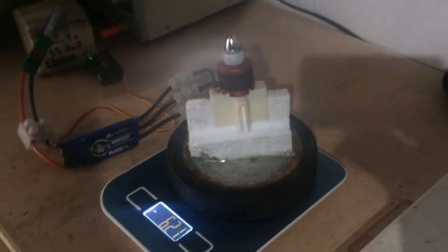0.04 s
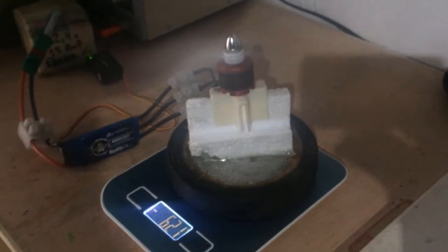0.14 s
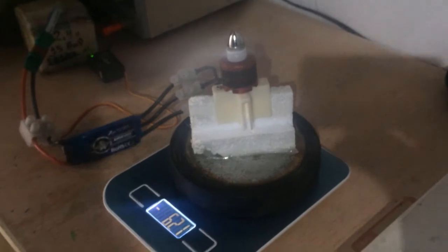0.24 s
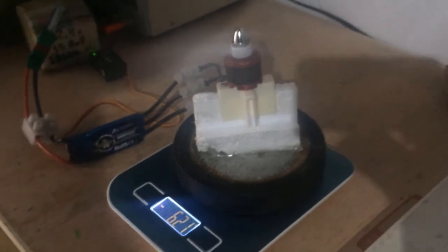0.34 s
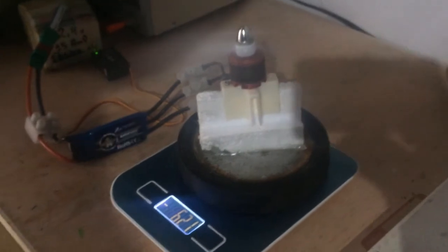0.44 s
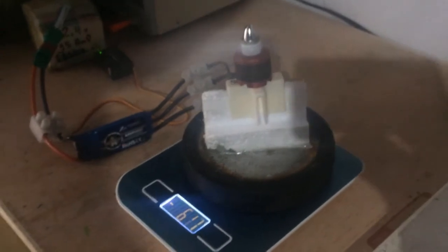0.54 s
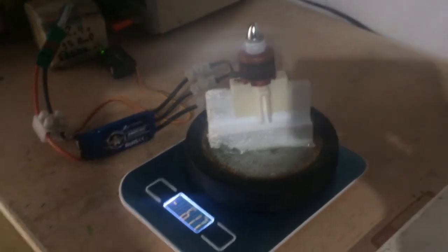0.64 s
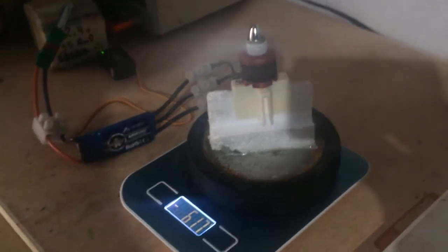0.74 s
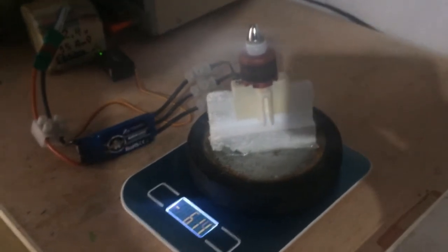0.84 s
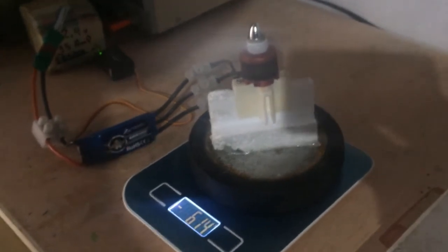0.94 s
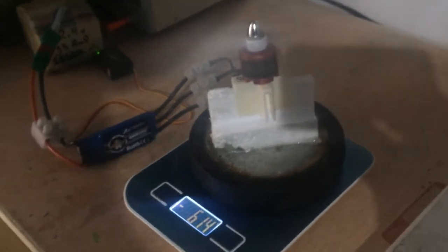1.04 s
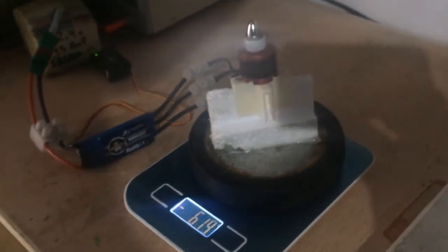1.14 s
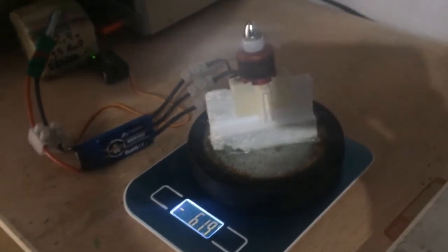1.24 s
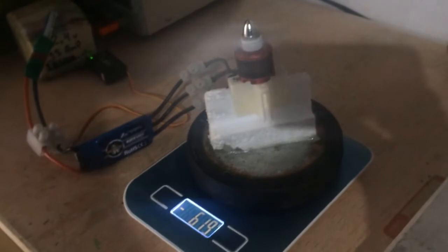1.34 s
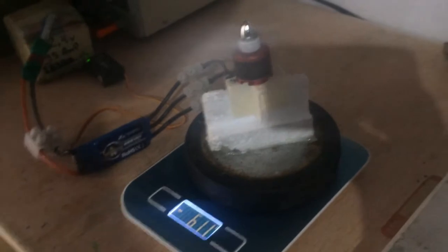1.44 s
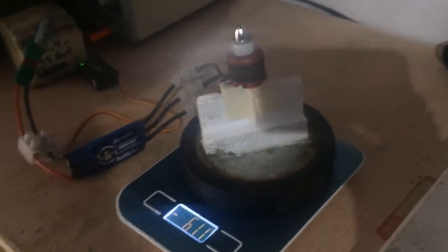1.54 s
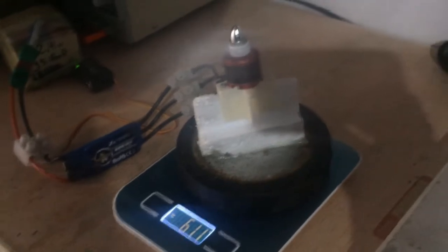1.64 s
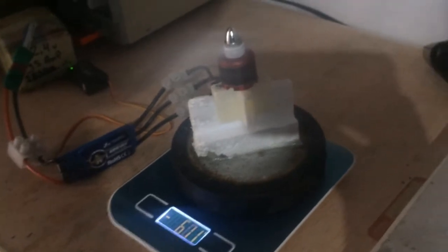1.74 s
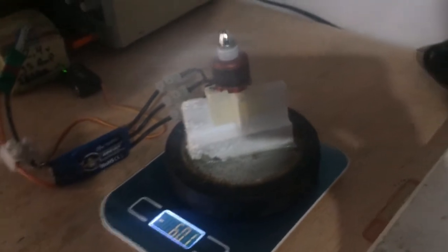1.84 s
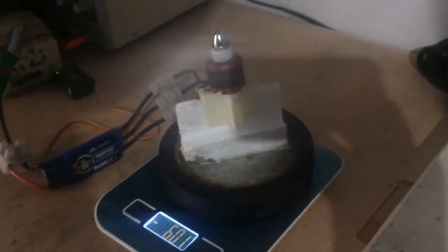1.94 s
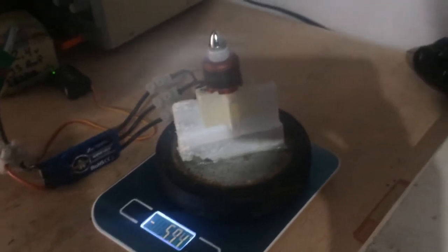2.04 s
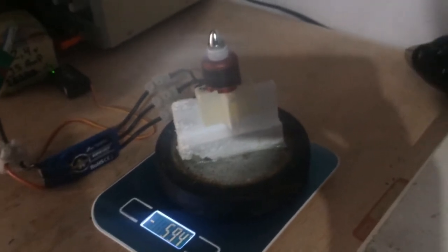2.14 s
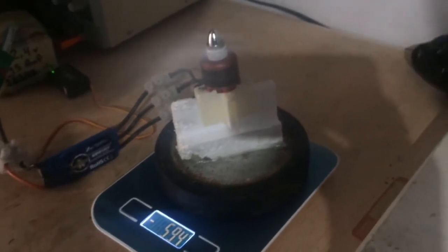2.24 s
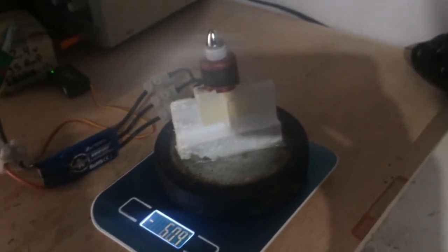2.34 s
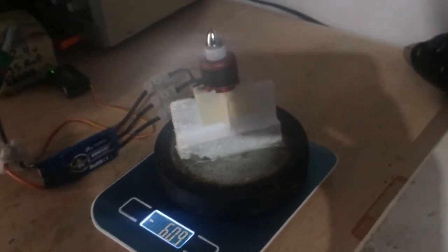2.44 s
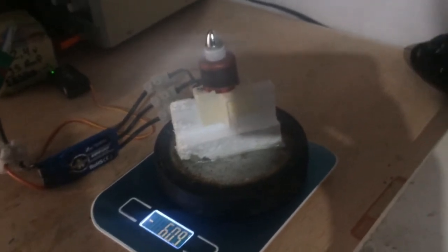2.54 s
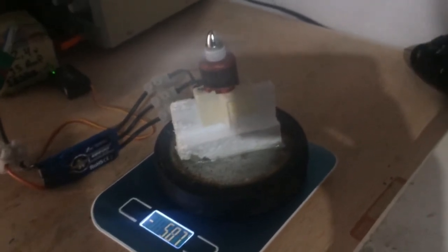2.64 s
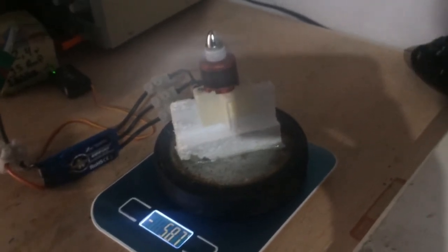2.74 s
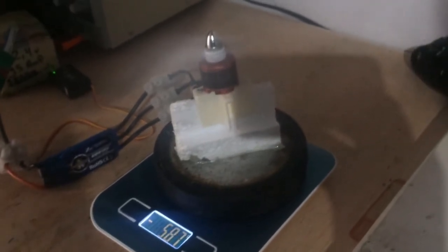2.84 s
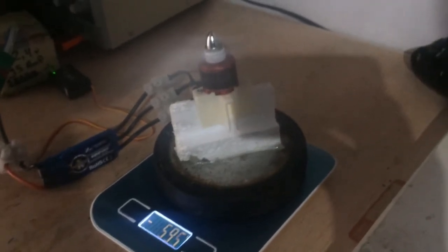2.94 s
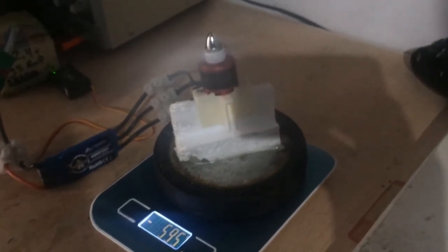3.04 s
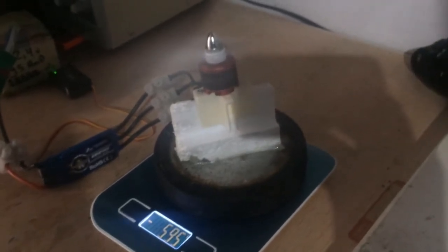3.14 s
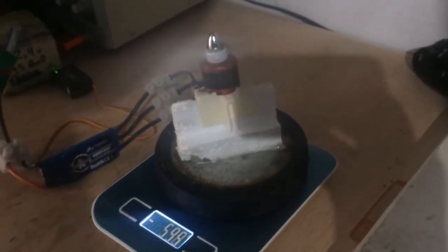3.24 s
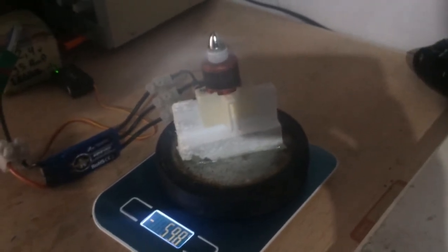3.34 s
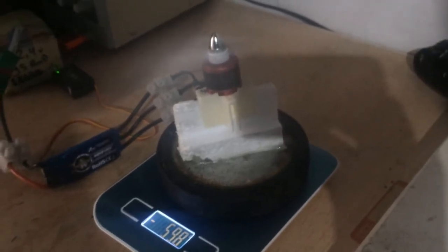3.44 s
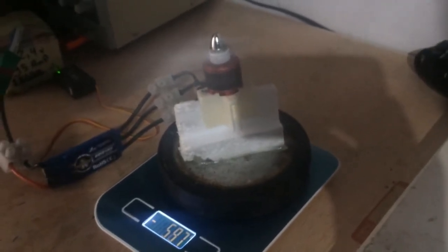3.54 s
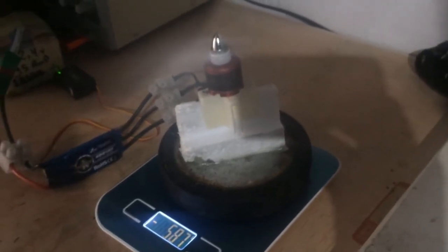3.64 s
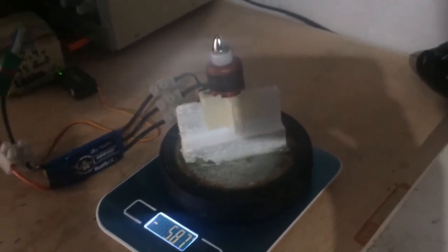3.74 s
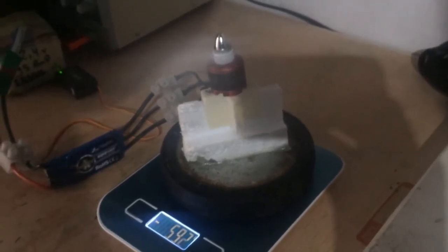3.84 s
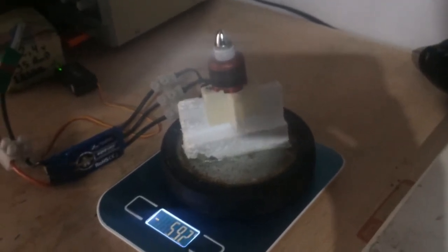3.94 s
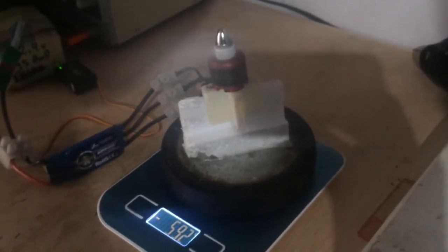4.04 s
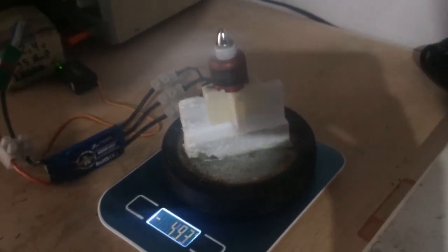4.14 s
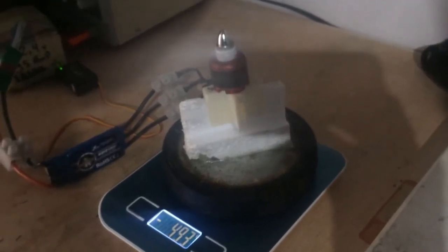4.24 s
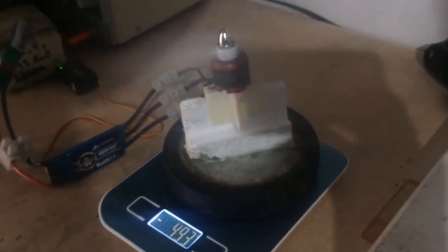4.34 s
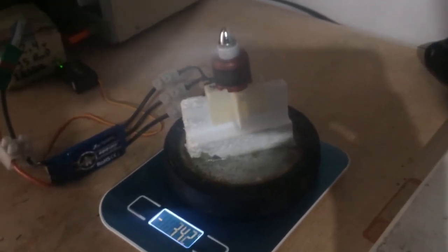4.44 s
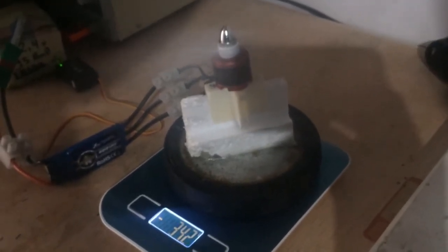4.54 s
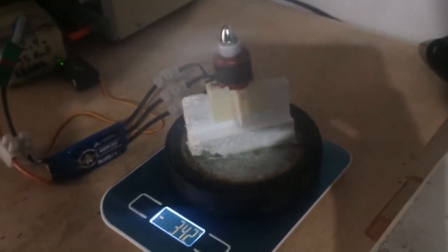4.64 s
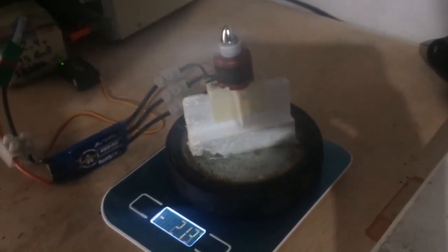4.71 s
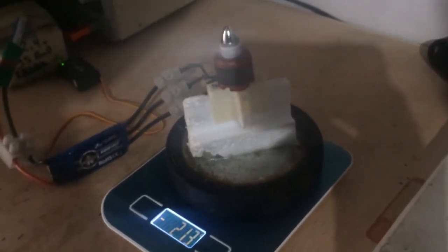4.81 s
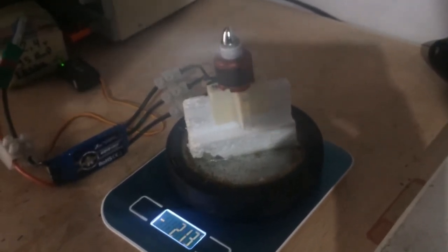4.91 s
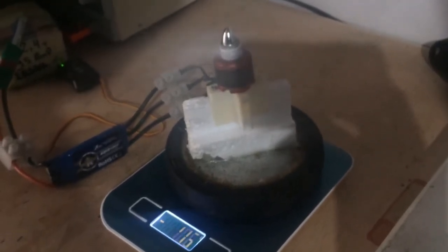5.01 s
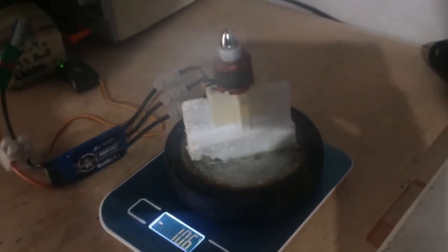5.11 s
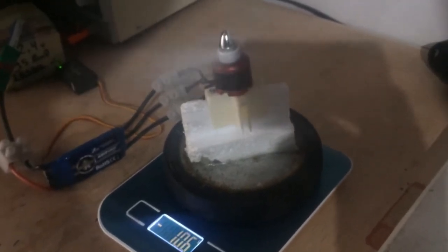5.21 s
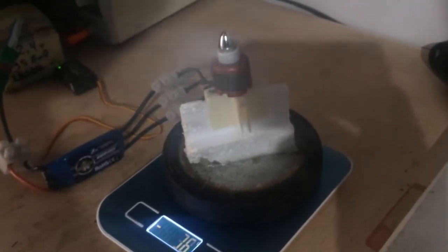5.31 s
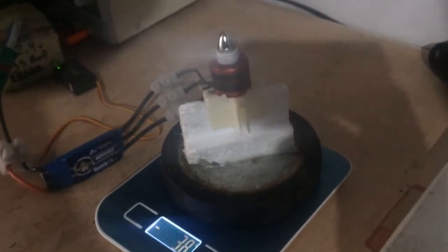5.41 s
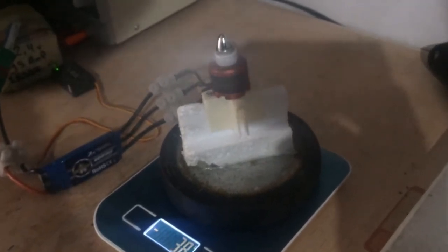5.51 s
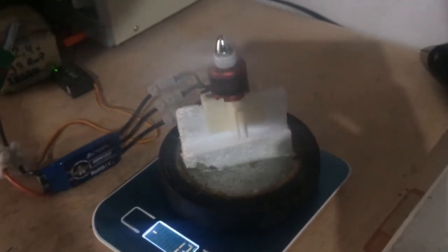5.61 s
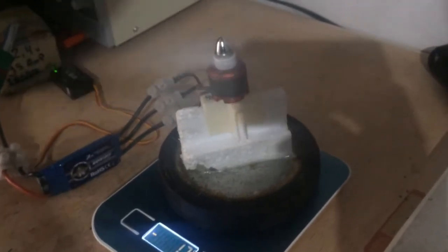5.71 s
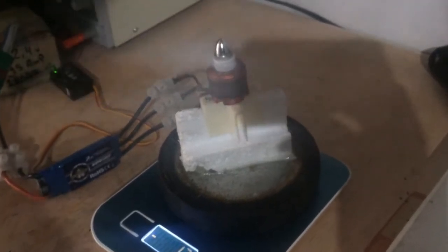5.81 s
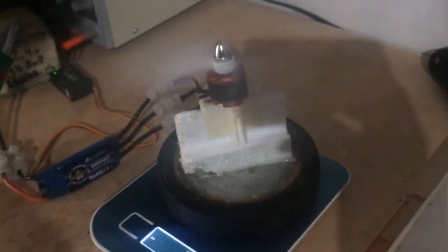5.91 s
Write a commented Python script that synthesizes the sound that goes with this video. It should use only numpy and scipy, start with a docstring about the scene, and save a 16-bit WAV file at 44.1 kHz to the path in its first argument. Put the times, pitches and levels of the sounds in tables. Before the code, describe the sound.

Close up in a small room, a little brushless motor spins a two-blade propeller flat out: deep blade hum, choppy fluttering air, bright hiss, a high whine and bearing rattle. Just before four seconds the throttle drops; pitch slides down under a thin electronic whistle, which stops at about five seconds, leaving a short ping and loose knocks dying into quiet room noise.

```python
"""A 14-pole brushless motor spins a two-blade propeller on a kitchen scale, close to the microphone in a small room.
At full throttle the blades hum, chop eddies and hiss; the magnets whine and a worn bearing sings and rattles.
Just before 4 s the throttle is pulled back: the controller's switching whistles through the motor's resonances.
The rotor slows and the whistle stops at about 5 s; the stand pings and the loose rotor knocks as it coasts.
Tones follow one shaft angle; air and rattle are shaped noise. Both channels are the same."""
import sys
import numpy as np
from scipy import signal
from scipy.fft import rfft, irfft, next_fast_len
from scipy.io import wavfile

SR = 44100
rng = np.random.default_rng(int(sys.argv[2]) if len(sys.argv) > 2 else 0)


def unload_audio(sound):
    """Save the sound as a 16-bit wav file, at the path given as the first command line argument."""
    columns = np.transpose(np.atleast_2d(sound))
    # keep every value between -1 and 1, then stretch to whole-number steps
    steps = np.round(np.clip(columns, -1, 1) * 32767)
    wavfile.write(sys.argv[1], SR, steps.astype(np.int16))


N = 263361
T = np.arange(N) / SR

# All levels in the tables are relative: the layers set further gains.

# Shaft speed from full throttle, through the pull-back, to the coast: time_s, shaft_hz
RUNDOWN = [(3.81, 126), (3.86, 124.4), (3.93, 119), (4, 114.5), (4.1, 106.7), (4.2, 100), (4.3, 96.4),
           (4.5, 82.6), (4.6, 76.4), (4.8, 61.8), (4.9, 56.5), (5.1, 41.1), (5.3, 31), (5.5, 23),
           (5.95, 14.3)]
# At full throttle the speed sags slowly with the battery
FULL_HZ, SAG_HZ_PER_S = 126.66, .17
# The chop swells and sinks; it also sinks a little as the slowdown begins: centre_s, swell_db
SWELLS = [(.35, 4.5), (.75, 3), (1.36, 4), (2.15, 3), (2.4, 2), (2.75, -1.5), (3.03, 3), (3.55, -2),
          (3.75, 4), (4.03, -2)]
SWELL_S = 0.1203
# The shaft speeds up a little with each swell of the chop
SWELL_HZ_PER_DB = .035

# Steady blade tones: multiple_of_shaft_rate, level_db
BLADE_ORDERS = [(1, -25), (2, 0), (4, -16), (6, -22), (8, -16), (10, -22), (12, -24), (16, -18)]
# The blade hum sinks with its pitch: blade_pass_hz, gain_db
HUM_GAIN = [(40, -62), (70, -41.5), (86, -30.5), (108, -28), (175, -23.5), (212, -18), (242, -13),
            (256, -15)]
# Resonance of the stand that the hum excites: centre_hz, width_hz, level_db
HUM_STAND_MODE = [(728, 18, -13)]

# Spectra of chopped eddies and trailing-edge hiss: frequency_hz, level_db
EDDY_SPECTRUM = [(250, -5), (500, -5.5), (750, -1), (1000, 3), (1300, 2), (1600, 1.5), (2300, -5.5),
                 (2900, -4.5), (3350, -6), (3800, -13.5), (4400, -11.5), (6000, -21), (8000, -32)]
HISS_SPECTRUM = [(30, -26), (150, -4), (350, -7.5), (600, -5.5), (1100, -5), (2000, 0), (4000, -2),
                 (5500, 0.5), (7500, 0), (10000, -3.5), (12000, -7), (15500, -12.5)]
# Eddies, hiss and rattle are steady at speed, weaker below a knee: level_db, knee_shaft_hz, loss_db_per_halving
EDDY_LAW = (-19.5, 118, 13.5)
HISS_LAW = (-16.5, 78, 25)
RATTLE_LAW = (-19, 44.7, 18)

# The scale rocks on its springs: centre_hz, width_hz, level_db
SCALE_MODES = [(69, 14.5, -1.5), (112.4, 13, 1.5), (221.03, 90, -11.5)]

# Pull of the poles under power, and of slots and poles when coasting: multiple_of_shaft_rate, level_db
POLE_ORDERS = [(14, 0)]
COGGING_ORDERS = [(12, -9), (14, 0)]
# The pole tone fades slowly under power
POLE_START_DB, POLE_FADE_DB_PER_S = -17.5, 1.4
# Six commutations per pole pair, and other multiples of the electrical rate: multiple_of_shaft_rate, level_db
WHINE_ORDERS = [(42, 0), (56, -31), (63, -31), (84, -30)]
# Gain of the commutation whine: time_s, gain_db
WHINE_GAIN = [(.1, -11.7), (.35, -10), (1.1, -13.5), (1.55, -13.3), (1.7, -17.5), (2.4, -17.5), (3.2, -15),
              (3.8, -16.5)]
# Each passing blade loads the motor and puts sidebands on the whine: multiple_of_shaft_rate, level_db
SIDEBAND_ORDERS = [(38, -2), (40, -6), (44, 0), (46, -7), (48, -14)]

# The balls roll out of step with the shaft: multiple_of_shaft_rate, level_db
BEARING_ORDERS = [(7, -13), (14.98, -4), (15.12, 0), (18.12, -10), (19.11, -10), (19.25, -12), (20.11, -4),
                  (20.25, -10), (21.14, -13), (21.25, -11), (22.14, -10)]
# Resonances of motor and stand: centre_hz, width_hz, level_db
STAND_MODES = [(539, 53, -11), (874, 27, -7), (1432, 52.67, -7), (1888, 77.4, 2.5), (2253, 186, -3),
               (2436, 106, 1.5), (2670, 173, -5), (3220, 84, -4)]
# Spectrum of the rattle: frequency_hz, level_db
RATTLE_SPECTRUM = [(100, -23), (500, -11), (1200, -17), (2000, -22), (3200, -10), (4000, -32), (7500, -27),
                   (10000, -45), (14000, -61)]
# The rattle starts softer and builds as the motor runs
RATTLE_BUILD_DB, RATTLE_BUILD_S = 9.5, 0.79

# Quiet room noise: frequency_hz, level_db
ROOM_SPECTRUM = [(25, -18), (50, -3), (120, -2.5), (300, -9.5), (700, 3), (1200, -10), (3000, -22),
                 (6000, -41.5), (15000, -58)]

# The controller's switching rate creeps up; SWITCH_HZ is its value at PART_THROTTLE_S
PART_THROTTLE_S, SWITCH_HZ, SWITCH_DRIFT_HZ_PER_S = 3.9, 7709, 62
# Its whistle is loudest at middling throttle: level_db, peak_shaft_hz, shaft_hz_either_side_for_6_db_less
WHISTLE_LAW = (-17, 102.6, 41)
# Force waves of the chopped current: multiple_of_switching_rate, multiple_of_shaft_rate
FORCE_WAVES = [(0, 14), (0, 21), (0, 21), (0, 42), (0, 42), (0, 49), (0, 70), (0, 84), (0, 98), (1, -21),
               (1, -21), (1, -28), (1, -35)]
# The motor resonance each wave sweeps through, in the same order; the response is squared in use:
# centre_hz, width_hz, level_db before squaring
MOTOR_MODES = [(1403, 38, 0), (2180, 48, 1), (1883, 80, -0.5), (3165, 90, -1.5), (4960, 156, -4),
               (4930, 83, -0.5), (4976.6, 120, -2.5), (6550, 200, -4), (5150, 260, -3), (5860, 190, -4.5),
               (6690, 140, -8), (5190.7, 110, -0.5), (4970, 72.405, -1)]

# Knocks of the loose rotor: time_s, level_db
KNOCKS = [(5.0155, -13), (5.0384, -17.5), (5.1586, -13.5), (5.1946, -17), (5.2143, -22), (5.2335, -20),
          (5.2649, -20), (5.3063, -23.5), (5.338, -19.5), (5.3714, -13.5), (5.4096, -24), (5.4463, -17.5),
          (5.4879, -18), (5.5193, -20), (5.5327, -17), (5.5603, -37), (5.578, -18.5), (5.6096, -23),
          (5.6234, -26), (5.672, -20), (5.7256, -17.5), (5.783, -16), (5.839, -20.5), (5.9047, -13)]
# The stand pings as the drive lets go: centre_s, pitch_hz, level_db
PING = (5.089, 1896, -9)

START_S, TOP_HZ = .083, 15500


def undb(db):
    """Decibels to an amplitude factor."""
    return 10 ** (np.asarray(db) / 20)


def curves(table):
    """Each column of a table, joined by straight lines in time."""
    s, *columns = np.transpose(table)
    return [np.interp(T, s, column) for column in columns]


def unit(x):
    """Scaled to rms 1."""
    return x / np.sqrt(np.mean(x ** 2))


def noise():
    """White noise over the whole scene."""
    return rng.standard_normal(N)


def walk(rate):
    """Smooth chance with rms 1 that changes about rate times a second."""
    count = 2048
    walk_hz = np.arange(count // 2 + 1) * SR / N
    spectrum = rfft(rng.standard_normal(count)) / (1 + (walk_hz / rate) ** 2)
    return unit(np.interp(np.arange(N) * count / N, np.arange(count), irfft(spectrum)))


def gain_at(hz, points):
    """Gain of a spectrum table at given frequencies, joined on a log frequency axis."""
    f, db = np.transpose(points)
    return undb(np.interp(np.log(hz + 1e-9), np.log(f), db))


def response(hz, modes):
    """Complex response of a set of resonances; neighbours alternate in sign."""
    total = 0
    for k, (centre, width, db) in enumerate(modes):
        damping = 1j * hz * width
        total = total + (-1) ** k * undb(db) * damping / (centre * centre - hz * hz + damping)
    return total


def filtered(x, shape, table):
    """x through a spectrum or a set of resonances."""
    size = next_fast_len(N + SR // 2)
    hz = np.arange(size // 2 + 1) * SR / size
    return irfft(rfft(x, size) * shape(hz, table), size)[:N]


def fade(start, end):
    """Goes from 0 at start to 1 at end; with end before start it falls from 1 to 0."""
    return np.clip((T - start) / (end - start), 0, 1)


def tones(angle, orders, flutter_db, rate):
    """Sines locked to the shaft, each fluttering a little in level."""
    total = 0
    for k, db in orders:
        level = undb(db + flutter_db * walk(rate))
        total = total + level * np.sin(k * angle + rng.uniform(0, 2 * np.pi))
    return np.sqrt(2) * total


def by_speed(hz, law):
    """Level in dB of a source that is steady at speed and falls off below a knee."""
    db, knee_hz, halving_db = law
    return db - 10 * np.log10(1 + (knee_hz / hz) ** (halving_db / (10 * np.log10(2))))


def propeller(angle, hz, build_db=2.5, build_s=1.942):
    """Steady hum of the blades; its third harmonic flares as it sinks through a stand resonance."""
    flare = np.abs(response(6 * hz, HUM_STAND_MODE)) * np.sin(6 * angle) * fade(3.8, 3.88)
    # with less thrust the second harmonic stands out more
    second = undb(-14.5) * np.sin(2 * 2 * angle) * fade(5.1, 5.15)
    gain = gain_at(2 * hz, HUM_GAIN) * undb(-build_db * fade(build_s, 0))
    return gain * (tones(angle, BLADE_ORDERS, flutter_db=0.65, rate=15) + second) + flare


def swells():
    """Rise and fall of the chop in dB, a bell-shaped bump or dip at each listed time."""
    return sum(db * np.exp(-((T - s) / SWELL_S) ** 2) for s, db in SWELLS)


def eddies(angle, hz, life_hz=12, wander_rad=.12, own=0.99):
    """Both blades cut each eddy drawn into the disc: bursts of pulses whose strength and timing drift."""
    out, power = 0, 0
    strength_a, strength_b = walk(life_hz), walk(life_hz)
    angle_a = 2 * angle + wander_rad * walk(life_hz)
    angle_b = 2 * angle + wander_rad * walk(life_hz)
    for k in range(2, 27):  # harmonics of the blade passing rate
        gain = gain_at(2 * k * hz, EDDY_SPECTRUM)
        large = strength_a * np.cos(k * angle_a) + strength_b * np.sin(k * angle_b)
        # small eddies pass sooner and blur the high harmonics
        small = walk(2.23 * k) * np.cos(2 * k * angle) + walk(2.24 * k) * np.sin(2 * k * angle)
        out = out + gain * (large + own * np.sqrt(k / 4) * small)
        power = power + gain ** 2
    return out / np.sqrt(power)


def hiss(angle, hz, swish=0.12, slow_hz=45, fast_hz=95):
    """Turbulence at the trailing edges, louder as each blade goes by; its peak sinks as the blades slow."""
    bright = unit(filtered(noise(), gain_at, HISS_SPECTRUM))
    dull = filtered(bright, gain_at, [(1500, -5), (4300, 7), (6500, 2.0), (9000, -0.5), (14000, -16)])
    speed = np.clip((hz - slow_hz) / (fast_hz - slow_hz), 0, 1)
    blend = speed * bright + (1 - speed) * dull
    return blend * (1 + swish * np.cos(2 * angle)) * undb(0.58 * walk(21))


def wash(angle):
    """The downwash rocks the scale, and the rotor's unbalance shakes it during the slowdown."""
    buffet = undb(-27.5) * unit(filtered(noise(), response, SCALE_MODES)) * fade(4.73, 3.7)
    unbalance = np.sin(angle) * fade(4.0, 4.04) * fade(4.86, 4.14)
    return buffet + undb(-23) * filtered(unbalance, response, SCALE_MODES)


def magnets(angle):
    """Poles pull at the stator 14 times a turn and the windings switch 42 times; coasting leaves faint cogging."""
    whine_db, = curves(WHINE_GAIN)
    pole_db = POLE_START_DB - POLE_FADE_DB_PER_S * T
    pole = undb(pole_db) * tones(angle, POLE_ORDERS, flutter_db=0.9, rate=27)
    whine = undb(whine_db) * tones(angle, WHINE_ORDERS, flutter_db=1, rate=21)
    sideband_db = -33.0 + 5.2 * fade(.5, 2.2)
    sidebands = undb(sideband_db) * tones(angle, SIDEBAND_ORDERS, flutter_db=1.5, rate=8)
    cogging = undb(-48.5) * tones(angle, COGGING_ORDERS, flutter_db=3, rate=14) * fade(5.37, 5.8)
    return (pole + sidebands) * fade(3.92, 3.86) + whine * fade(3.87, 3.82) + cogging


def bearing(angle, hz, lope=0.22, slack_db=4.0, tick_db=6.0, knock_db=14.5):
    """The balls sing while the shaft runs fast; without thrust the slack rotor chatters and knocks in the stand."""
    rattle_db = by_speed(hz, RATTLE_LAW) - RATTLE_BUILD_DB * np.exp(-T / RATTLE_BUILD_S)
    song = tones(angle, BEARING_ORDERS, flutter_db=2.5, rate=4.9) * undb(rattle_db - 7.5) * fade(4.44, 4.04)
    # a slack rotor touches twice a turn, never equally hard
    touch_db = slack_db + tick_db * (np.cos(2 * angle) - .3) + 2.8 * walk(70)
    chatter_db = rattle_db + 4 + 0.79 * walk(35.341) + fade(3.4, 4.57) * touch_db
    chatter = noise() * (1 + lope * np.cos(angle)) * undb(chatter_db)
    contact = chatter + undb(knock_db) * knocks()
    ringing = undb(6) * filtered(contact, response, STAND_MODES)
    rattle = undb(-6.0) * filtered(contact, gain_at, RATTLE_SPECTRUM)
    return song + ringing + rattle


def room(x, t60_s=0.27, wet_db=-11):
    """A small room answers with a short, dense tail of decaying noise."""
    age = T[:SR // 2]
    tail = rng.standard_normal(len(age)) * np.exp(-np.log(1000) * age / t60_s) * (age > .006)
    return x + undb(wet_db) * signal.fftconvolve(x, tail / np.linalg.norm(tail))[:N]


def background():
    """Quiet room noise and a little mains hum."""
    air = undb(-44.5) * unit(filtered(noise(), gain_at, ROOM_SPECTRUM))
    return air + undb(-51) * np.sin(2 * np.pi * 50 * T)


def controller(angle, hz):
    """The chopped current whistles; its force waves sing as they sweep through the motor's resonances."""
    switch_hz = SWITCH_HZ + SWITCH_DRIFT_HZ_PER_S * (T - PART_THROTTLE_S)
    db, peak_hz, spread_hz = WHISTLE_LAW
    ripple = undb(db) * .5 ** (((hz - peak_hz) / spread_hz) ** 2)
    carrier = 2 * np.pi * np.cumsum(switch_hz) / SR
    out = np.sin(carrier) * undb(1.7 * walk(17)) * fade(3.8, 4.1253)
    for (m, k), mode in zip(FORCE_WAVES, MOTOR_MODES):
        resonance = np.abs(response(m * switch_hz + k * hz, [mode])) ** 2
        out = out + resonance * np.sin(m * carrier + k * angle)
    return np.sqrt(2) * out * ripple * fade(3.84, 3.9) * fade(5.1, 5.02)


def knocks(rise_s=0.0032, fall_s=0.0041, after_db=-21, after_s=0.02):
    """Each knock is a short scrape of many tiny contacts, noise in a quick swell with a faint longer tail."""
    push = np.zeros(N)
    for s, db in KNOCKS:
        age = np.maximum(T - s + 0.0023, 0)  # the swell begins just ahead of the listed time
        decay = np.exp(-age / fall_s) + undb(after_db) * np.exp(-age / after_s)
        push += undb(db) * (1 - np.exp(-(age / rise_s) ** 2)) * decay
    return push * noise()


def ping(length_s=0.0035):
    """One short, pure ring of the stand: a sine under a bell-shaped swell."""
    s, hz, db = PING
    return undb(db) * np.exp(-((T - s) / length_s) ** 2) * np.sin(2 * np.pi * hz * T)


def scene():
    """One shaft angle drives the rotating sources, and the shaft's speed sets many of their levels."""
    swell_db, cut = swells(), fade(3.75, 3.83)
    held_hz = FULL_HZ - SAG_HZ_PER_S * T + SWELL_HZ_PER_DB * swell_db
    hz = (1 - cut) * held_hz + cut * curves(RUNDOWN)[0]
    # the turning itself is slightly uneven
    angle = 2 * np.pi * np.cumsum(hz * (1 + 0.00039 * walk(7.6))) / SR
    hum = propeller(angle, hz)
    chop = undb(by_speed(hz, EDDY_LAW) + swell_db) * eddies(angle, hz) * fade(6.0, 5.55)
    rush = undb(by_speed(hz, HISS_LAW)) * hiss(angle, hz)
    motor = magnets(angle) + controller(angle, hz)
    in_room = room(rush + bearing(angle, hz) + ping())
    mono = hum + chop + motor + wash(angle) + in_room + background()
    return np.array([mono, mono])


def record(dry):
    """The sound cuts in abruptly; the highest peaks are rounded and the top is cut."""
    x = dry * fade(START_S, START_S + .002)
    x = x / (1 + x ** 8) ** (1 / 8)
    return signal.sosfilt(signal.ellip(12, .1, 80, TOP_HZ, fs=SR, output="sos"), x)


dry = scene()
out = record(dry)
unload_audio(out)
```